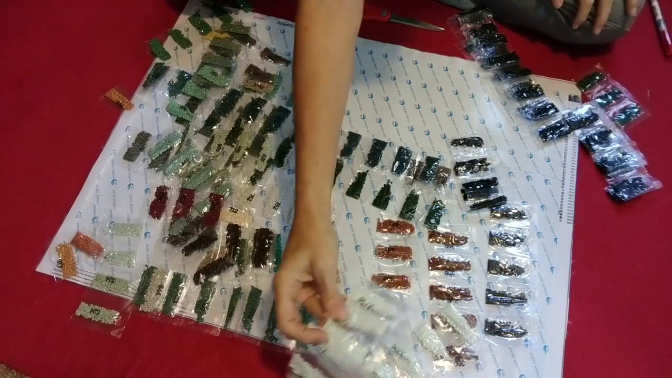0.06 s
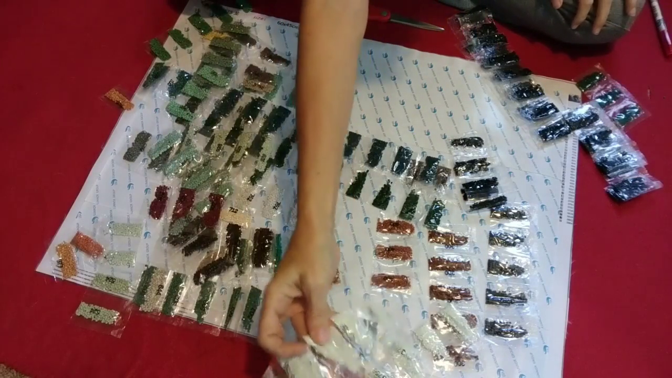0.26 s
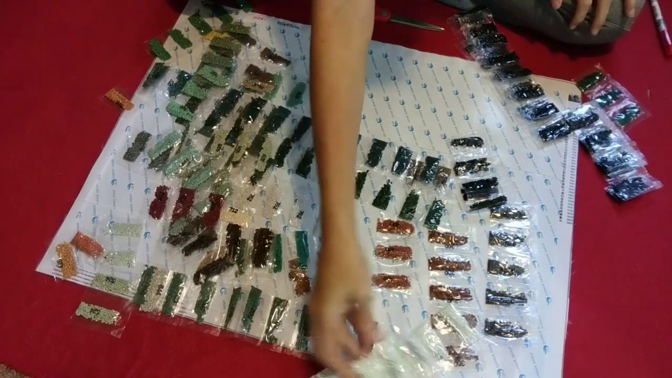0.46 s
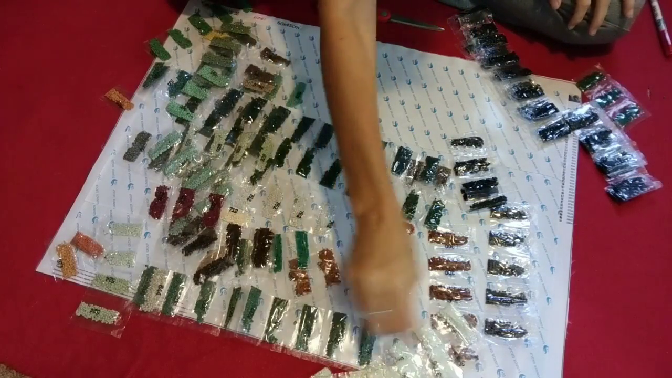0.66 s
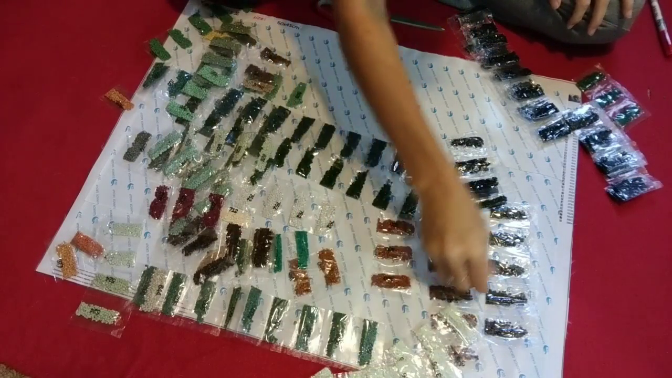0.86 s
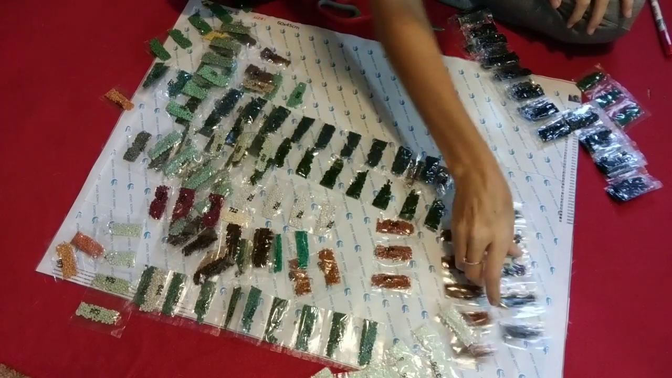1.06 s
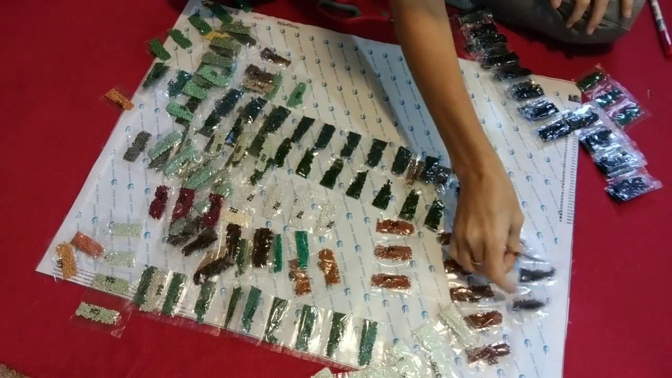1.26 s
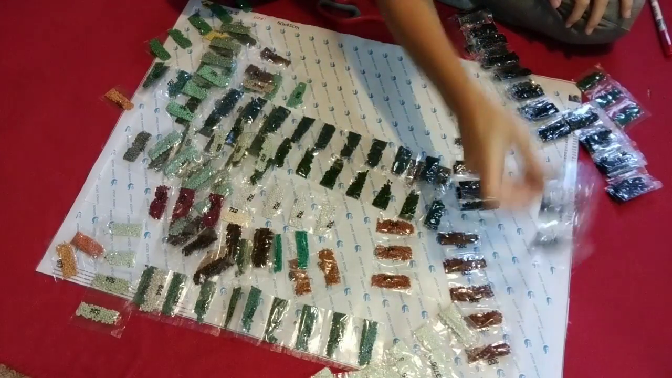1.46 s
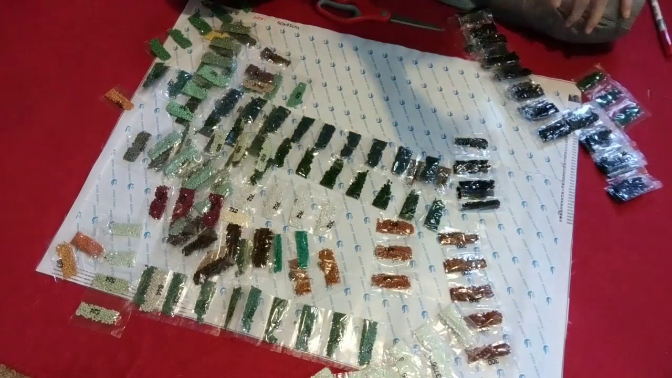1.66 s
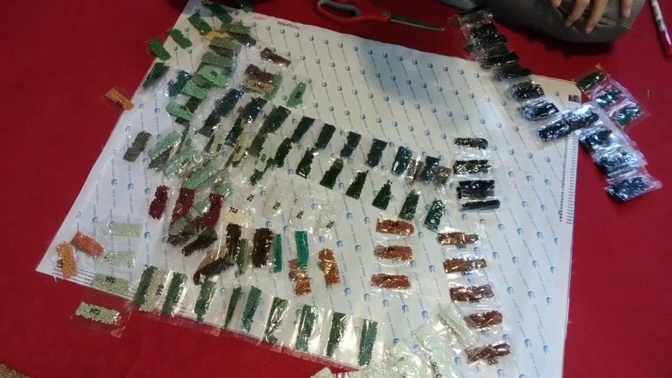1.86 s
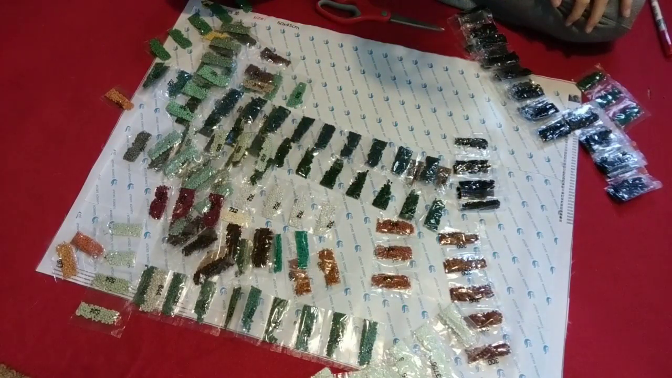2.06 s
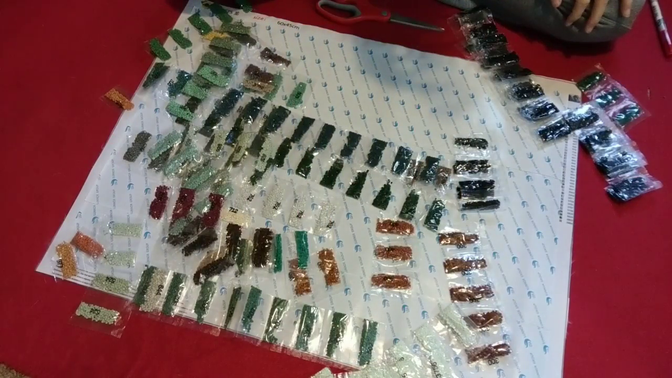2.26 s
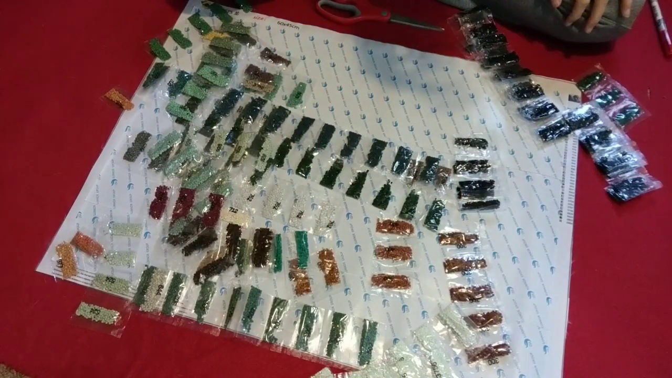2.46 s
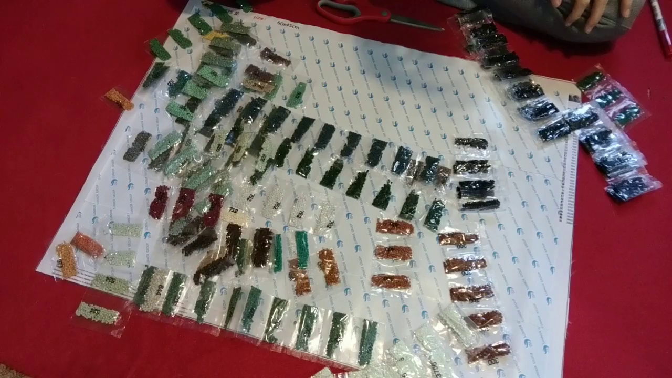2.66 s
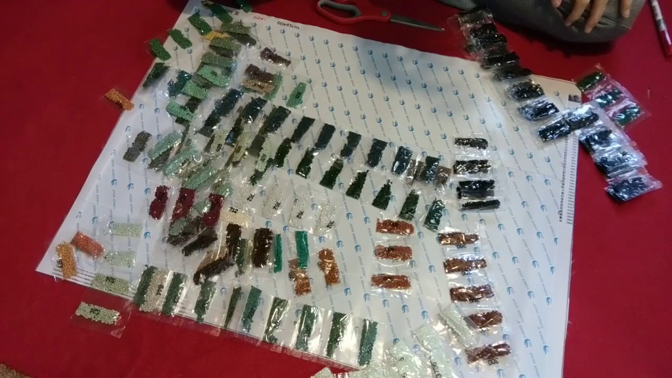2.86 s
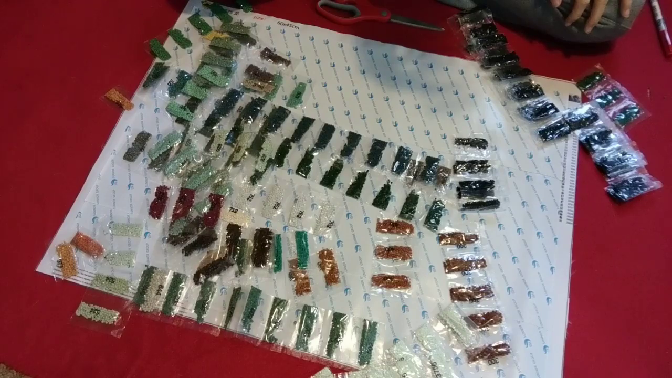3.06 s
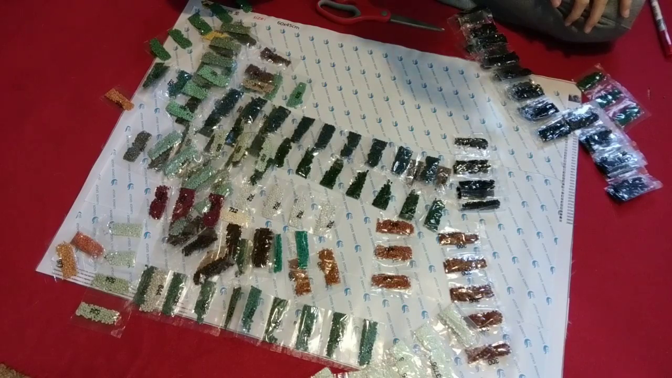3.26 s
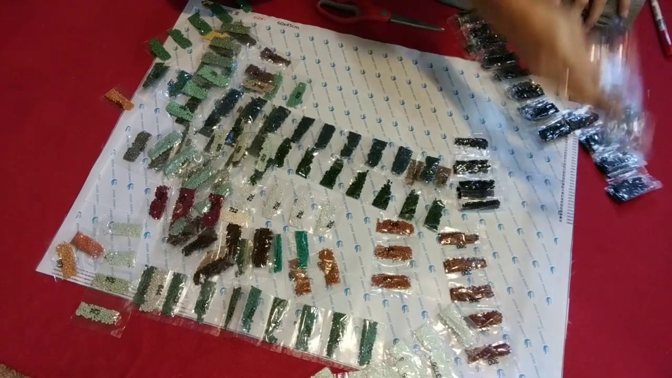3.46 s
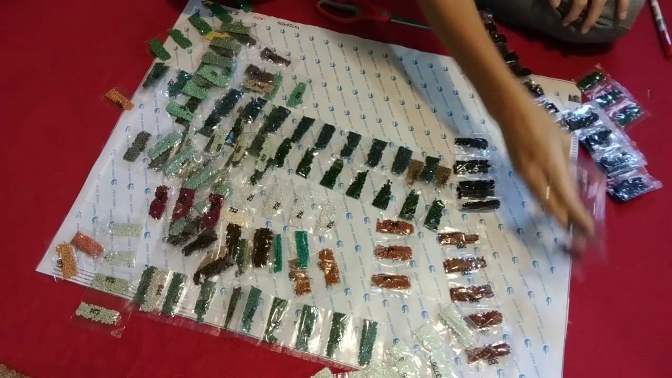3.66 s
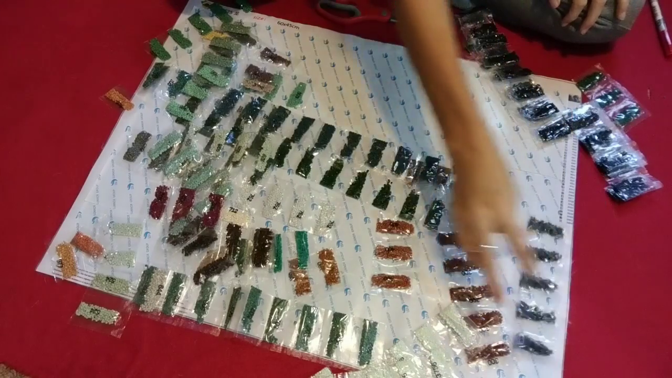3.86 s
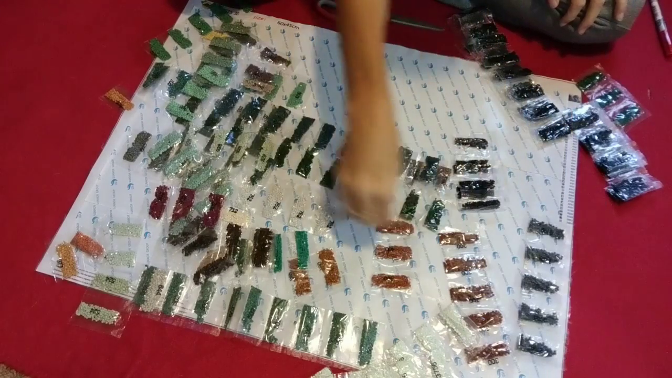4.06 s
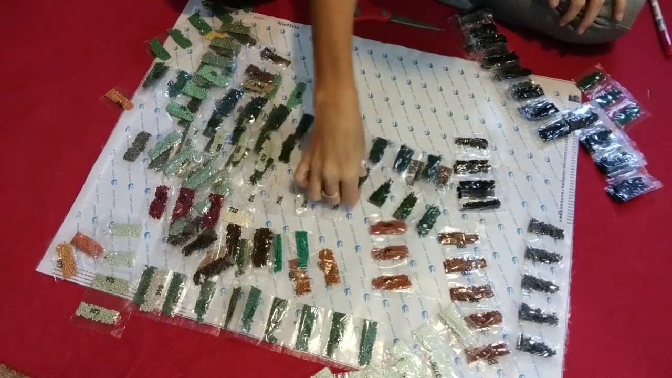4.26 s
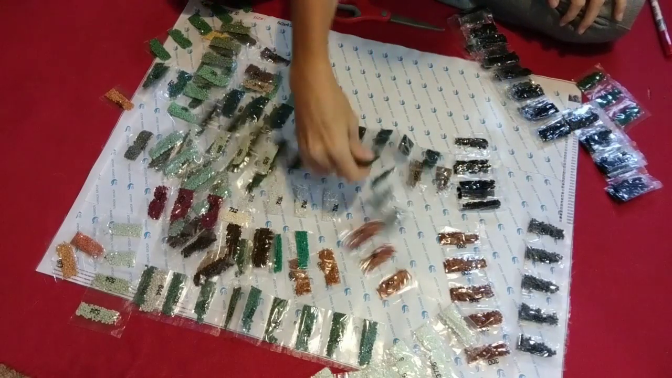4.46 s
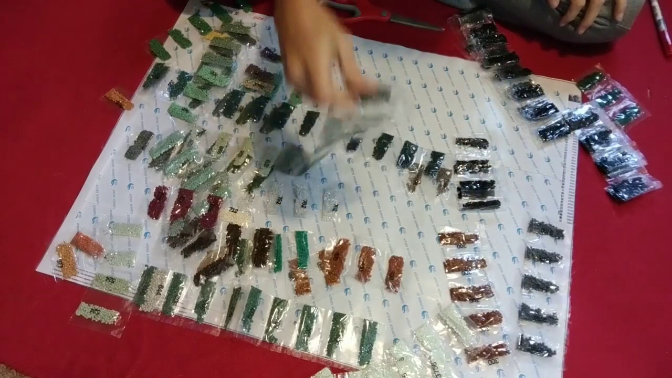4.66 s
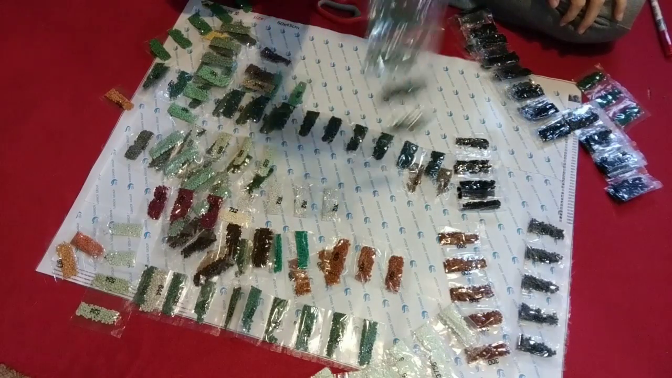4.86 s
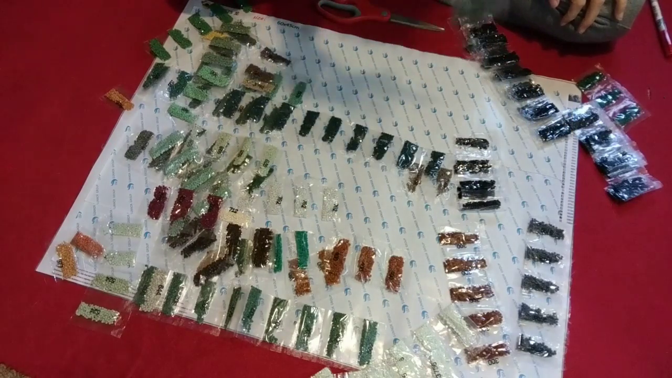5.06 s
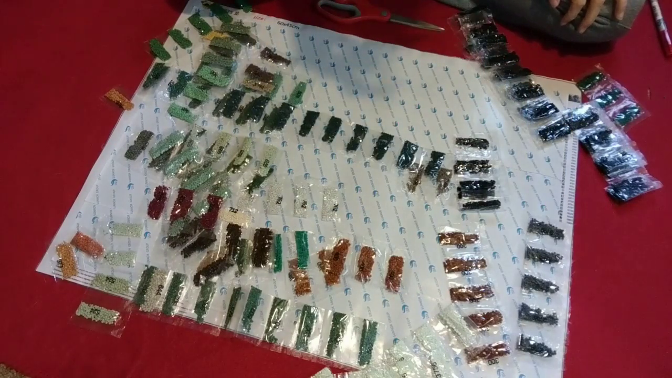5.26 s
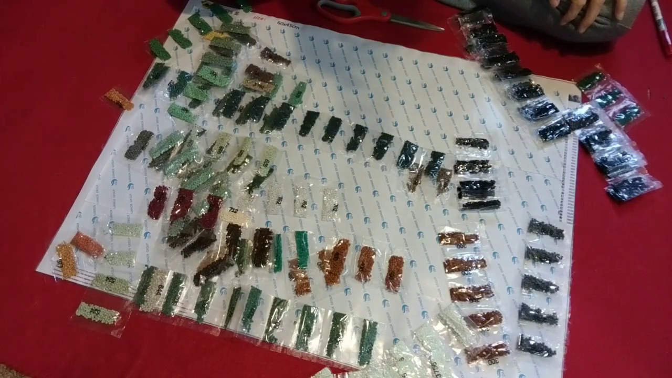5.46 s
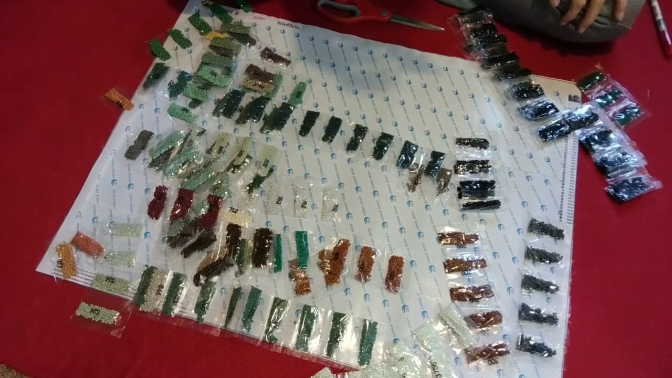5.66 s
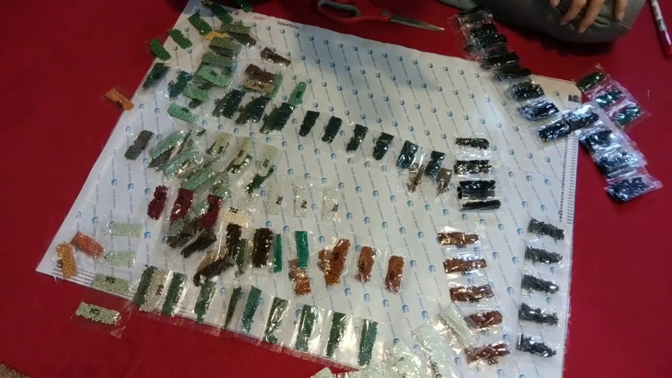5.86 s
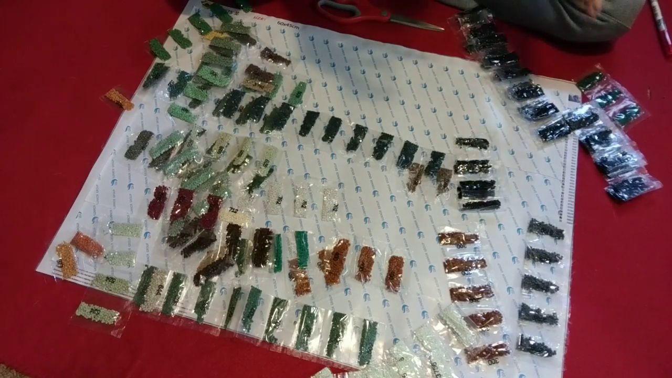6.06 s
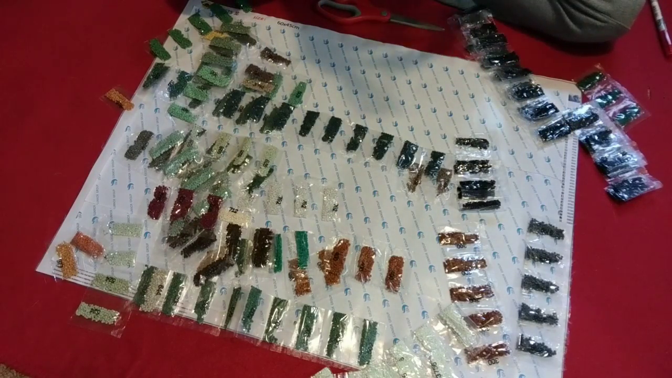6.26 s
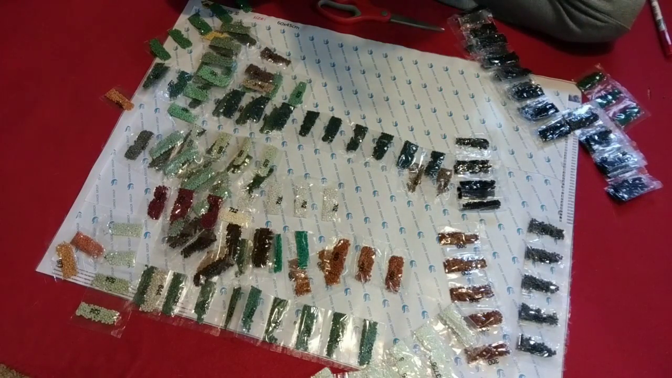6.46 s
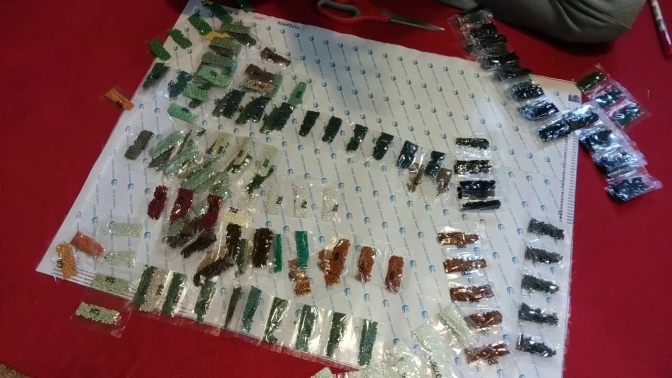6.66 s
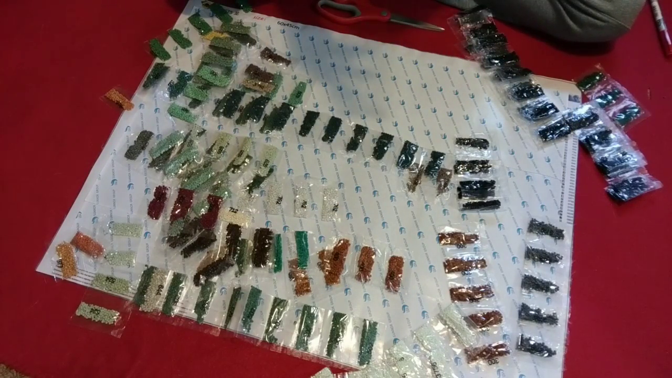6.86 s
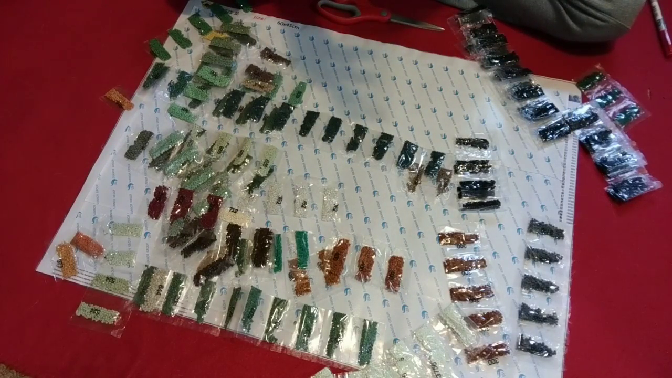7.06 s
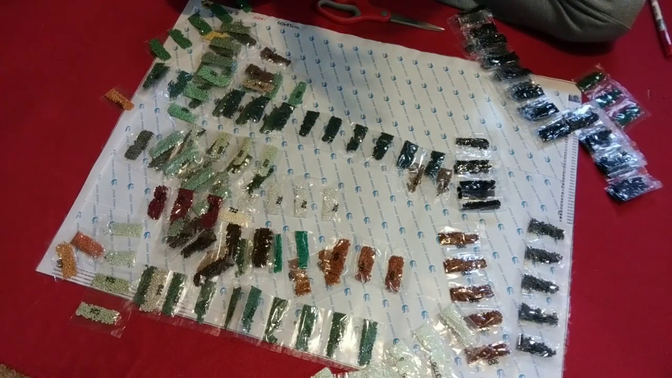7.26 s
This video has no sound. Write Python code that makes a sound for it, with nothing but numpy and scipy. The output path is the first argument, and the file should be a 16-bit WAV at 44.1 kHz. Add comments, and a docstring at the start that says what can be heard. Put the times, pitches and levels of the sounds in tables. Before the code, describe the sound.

Close, bright crinkling of small plastic bead bags being gathered by hand starts at once, pauses briefly, then flares and fades to sparse ticks. After a quiet gap a second busy flurry comes, with a crisp slap and sharp snaps. It thins out, then light rustling returns with one soft low thud near the end. Small quiet room, faint hiss and rumble.

```python
"""Small plastic bags of beads are gathered by hand from a sheet and laid down again, in a quiet room.
Film creases buckle singly (snaps: ringing facets) or in swarms (crinkle); sliding film hisses (shaped noise).
Slaps are short noise splashes; a brief squeak is narrow-band noise bending upward.
Soft bumps, the loudest near the end, are low noise pushes that set surface modes ringing.
Sparse random reflections make the room; faint hiss and a wavering rumble lie beneath."""
import sys
import numpy as np
from scipy import signal
from scipy.fft import rfft, irfft, next_fast_len
from scipy.io import wavfile
from scipy.ndimage import uniform_filter1d

SR = 44100
rng = np.random.default_rng(int(sys.argv[2]) if len(sys.argv) > 2 else 0)


def dump(signal):
    """Clip the signal to [-1, 1] and save it as 16-bit WAV at the path in sys.argv[1]."""
    limited = np.clip(np.atleast_2d(signal).T, -1, 1)
    pcm = np.round(limited * 32767).astype(np.int16)
    wavfile.write(sys.argv[1], SR, pcm)


N = 322371

# relative colour of the film: [f/Hz, density/dB per Hz]
FILM_COLOUR = [(60, -43.5), (250, -0.5), (600, -7.5), (2000, -4), (4000, 1), (10000, -1), (13000, -9),
               (16000, -10.5)]


def amp(db):
    """Decibels to gain."""
    return 10 ** (np.asarray(db) / 20)


def evened(x):
    """Scales to an rms of one."""
    return x / np.sqrt(np.mean(x ** 2) + 1e-20)


def unit(x):
    """Scales to an energy of one."""
    return x / np.linalg.norm(x)


def read(points, hz):
    """Interpolates (Hz, value) points on a log-frequency axis."""
    f, value = np.transpose(points)
    return np.interp(np.log(hz + 1), np.log(f + 1), value)


def coloured(x, points, size=4096):
    """Filters by a spectrum of (Hz, dB) points; minimum phase, so nothing sounds before its cause."""
    hz = abs(np.fft.fftfreq(size, 1 / SR))
    log_gain = np.log(amp(read(points, hz)))
    min_phase = np.exp(np.conj(signal.hilbert(log_gain)))
    taps = np.fft.ifft(min_phase).real[:size // 2]
    return signal.oaconvolve(x, taps)[:len(x)]


def add(mix, start_s, sound):
    """Mixes a sound in at its start time, cut at the end of the mix."""
    part = mix[max(round(start_s * SR), 0):][:len(sound)]
    part += sound[:len(part)]


def hush(level_db=-63.5, waver=0.31):
    """Faint steady hiss over a rumble that slowly wavers: noise plus its low end times a slow random drift."""
    # relative colour of the room noise: [f/Hz, density/dB per Hz]
    hush_colour = [(25, -10.5), (110, -4), (220, -8), (400, -11.5), (1200, -20.5), (2200, -22),
                   (6000, -24.5), (15500, -24.5)]
    noise = coloured(rng.standard_normal(N), hush_colour)
    rumble = signal.lfilter(*signal.butter(1, 500, fs=SR), noise)
    drift = uniform_filter1d(rng.standard_normal(N), SR // 8)
    drift = evened(uniform_filter1d(drift, SR // 20))
    return amp(level_db) * evened(noise + waver * drift * rumble)


def handling(rest_db=-76):
    """Each rustle rises, eases while held, then settles; returns effort, body lift and edge lift over time, dB."""
    # hand grips, drags or drops a bag:
    # [start/s, rise/s, hold/s, effort/dB, body near 1 kHz/dB, edge near 10 kHz/dB]
    rustles = [(0.0, 0.0018, 0.22, -41.5, 5.5, -4), (0.158, 0.036, 0.12, -41.5, 3, -0.5),
               (0.37, 0.069, 0.07, -50.5, 1, 3), (0.46, 0.024, 0.17, -45.5, 6, -1),
               (0.621, 0.018, .07, -34.5, 6.5, -4), (0.73, 0.0082, .02, -34, 1, -4.5),
               (0.933, 0.021, 0.018, -56, 7, -1), (1.125, 0.011, 0.0089, -41, 1.5, -0.5),
               (1.206, .015, 0.1, -39.5, 7.5, 2), (1.289, 0.047, 0.019, -32.5, -2, 0),
               (1.385, 0.017, 0.091, -37.5, 2.5, -1.5), (1.548, .015, 0.2, -43.5, 1, -6.5),
               (1.684, 0.021, 0.018, -34.5, 4.5, -3), (1.83, 0.023, 0.14, -59.5, 1.5, 1),
               (1.995, 0.022, 0.11, -53.5, 4.5, -0.5), (2.2, .03, 0.086, -64, 5, -4),
               (2.404, 0.0089, 0.06, -64, 2, 5), (3.318, 0.0045, 0.1, -59, 4, -5),
               (3.435, 0.063, 0.038, -41, 3, -4), (3.537, 0.034, 0.057, -35.5, 3, -2.5),
               (3.647, 0.0092, 0.016, -42, -11, 2), (3.7, .01, 0.052, -52.5, 3.5, 1.5),
               (3.814, 0.018, 0.13, -51, 10.5, 3.5), (3.94, 0.021, 0.038, -38.5, 5.5, -3),
               (4.04, 0.017, 0.02, -36.5, 9, 8), (4.365, .005, .03, -48, 5, 4.5),
               (4.384, 0.044, 0.067, -34, 3, 1.5), (4.529, 0.021, .04, -38.5, 4, 2),
               (4.618, 0.016, 0.11, -35.5, 9.5, -4), (4.722, 0.016, 0.043, -34, 0, -1),
               (4.821, 0.027, 0.063, -37, 5.5, 0.5), (4.95, .02, 0.027, -43, 4.5, -3),
               (5.038, .01, 0.2, -50, -3, -2.5), (5.176, 0.021, 0.14, -42.5, 4, -8),
               (5.306, 0.026, 0.046, -43.5, 4, -1), (5.407, 0.026, 0.15, -47, -4, -10),
               (5.96, 0.027, 0.044, -58, 6.5, -6), (6.118, 0.044, 0.032, -58.5, 5, -2),
               (6.304, 0.054, 0.13, -60.5, 2.5, -3), (6.485, 0.083, 0.059, -46, 6, -3.5),
               (6.699, 0.034, 0.051, -48, 7, -9), (6.843, 0.019, 0.066, -46, 6.5, -7.5),
               (6.931, .01, 0.04, -40.5, 10.5, -7), (7.031, 0.011, 0.057, -45, 9.5, -4.5),
               (7.154, 0.045, 0.058, -48.5, 7, -1.5)]
    ease_db_per_s, settle_db_per_s = 23.5, 262.5  # settling adds to easing
    firm_db, dulling = -42.5, 0.4  # lighter effort moves mainly broad folds: dB more body per dB less effort
    t = np.arange(SR) / SR
    power = np.full((3, N), amp(rest_db) ** 2)
    for start_s, rise_s, hold_s, db, body_db, edge_db in rustles:
        ease_db = ease_db_per_s * np.maximum(t - rise_s, 0)
        settle_db = settle_db_per_s * np.maximum(t - rise_s - hold_s, 0)
        grip = np.minimum(t / rise_s, 1) * amp(db - ease_db - settle_db)
        for band, lift_db in zip(power, [0, body_db, edge_db]):
            add(band, start_s, (grip * amp(lift_db)) ** 2)
    work_db, body_db, edge_db = 10 * np.log10(power)
    return work_db, body_db - work_db + dulling * (firm_db - work_db), edge_db - work_db


def facet(hz, crack_db, sharpness, flutter_db, flutter_s, flip_s=0.00013, crack_hz=10240):
    """A patch of film flips over and flutters briefly, ringing at its own pitch with a treble crack."""
    t = np.arange(600) / SR
    flip, flutter = rng.standard_normal((2, len(t)))
    flip = unit(flip * np.exp(-t / flip_s))
    flutter = unit(flutter * np.exp(-t / flutter_s))
    kick = flip + amp(flutter_db) * flutter
    kick = signal.lfilter(*signal.butter(1, hz / 2, "high", fs=SR), kick)  # a small patch radiates no bass
    ring = signal.lfilter(*signal.iirpeak(hz, max(sharpness, 1), fs=SR), kick)
    crack = signal.lfilter(*signal.iirpeak(crack_hz, 2, fs=SR), kick)
    return unit(unit(ring) + amp(crack_db) * unit(crack))


def swarm(work_db, per_s=2300, busy_db=-40, crowding=.55, spread_db=5, clump_db=2.5, clump_hz=60, count=96):
    """Tiny facet flips of many pitches and sizes, denser with effort; their sizes swell and dip in clumps."""
    sharpness, flutter_db, flutter_s = 1.8, -3, .0018
    rate_per_s = per_s * amp(crowding * (work_db - busy_db))  # per_s holds at busy_db
    flips = rng.random(N) < rate_per_s / SR
    sizes = amp(spread_db * np.minimum(rng.exponential(1, N), 3.2))
    sizes *= flips / np.sqrt(rate_per_s)  # density leaves the mean power alone
    clumps = evened(signal.lfilter(*signal.butter(2, clump_hz, fs=SR), rng.standard_normal(N)))
    sizes *= amp(clump_db * clumps)
    which, out = rng.integers(0, count, N), np.zeros(N)
    pitches_hz = np.linspace(np.sqrt(500), np.sqrt(15000), count) ** 2
    for k, (hz, width_hz) in enumerate(zip(pitches_hz, np.gradient(pitches_hz))):
        flip = facet(hz, -3.6, sharpness, flutter_db, flutter_s)
        out += np.sqrt(width_hz) * signal.oaconvolve(sizes * (which == k), flip)[:N]
    return evened(out)


def crinkle(level_db=-5.5, buckle_db=-60):
    """A light touch only slides the film with a hiss; a firmer one makes it buckle in swarms."""
    # centres of the body, middle and edge bands: [f/Hz]
    band_hz = [1100, 3800, 9500]
    work_db, body_db, edge_db = handling()
    buckling = 1 / (1 + amp(buckle_db - work_db) ** 2)  # share of power, half at buckle_db
    slide = rng.standard_normal(N)
    source = np.sqrt(buckling) * swarm(work_db) + np.sqrt(1 - buckling) * slide
    size = next_fast_len(N)
    hz = np.fft.rfftfreq(size, 1 / SR)
    spectrum = rfft(evened(coloured(source, FILM_COLOUR)), size)
    out = np.zeros(N)
    # broad folds give body, tight creases give edge
    for share, lift_db in zip(np.eye(3), [body_db, 0, edge_db]):
        weight = read(list(zip(band_hz, share)), hz)
        band = irfft(spectrum * weight, size)[:N]
        out += band * amp(work_db + lift_db + level_db)
    return out


def room(x, first_s=0.0022, reflections_per_s=5000):
    """Dense random reflections from the walls, each band dying at its own speed."""
    # decay of the room: [f/Hz, t60/s]
    room_decay = [(200, 0.39), (4000, 0.32), (9000, 0.25), (15000, 0.22)]
    size = SR // 2
    taps = rng.standard_normal(size) * (rng.random(size) < reflections_per_s / SR)
    hz, t, z = signal.stft(taps, SR, nperseg=256)
    decay_db = -60 * t / read(room_decay, hz)[:, None]
    tail = signal.istft(z * amp(decay_db), SR, nperseg=256)[1][:size]
    tail *= np.minimum(np.arange(size) / SR / first_s, 1) ** 2
    return signal.fftconvolve(x, unit(tail))[:N]


def snaps(wet_db=-7, scatter_db=-11):
    """Single creases buckle as facets; the walls also get what each sends elsewhere, in the film's colour."""
    # creases: [t/s, level over 2 ms before filtering/dB, facet pitch f/Hz, crack re ring/dB]
    creases = [(0.0807, -36.5, 2020, -12), (0.095, -34.5, 3420, -35), (0.2877, -38, 5820, -22),
               (0.401, -45, 3380, -6), (0.4745, -37, 2920, -12), (0.4856, -37.5, 720, -16),
               (0.5027, -37, 4330, -22), (0.5798, -35, 6760, -20), (0.9086, -41, 3300, 1),
               (0.9556, -44, 3770, -2), (1.3552, -27, 7390, -24), (1.3981, -29.5, 5500, -24),
               (1.4239, -31.5, 2620, 4), (1.5378, -38.5, 1900, -14), (1.748, -36, 1560, 1.5),
               (1.838, -41.5, 4420, 2), (1.8697, -41, 8050, 10), (1.955, -36.5, 2020, 3.5),
               (2.0312, -45.5, 1990, -9), (2.1043, -41.5, 5000, -18), (2.415, -39, 2600, -2.5),
               (2.4736, -39.5, 6760, -21), (2.5086, -38, 2910, 2.5), (2.8026, -41, 3160, 2.5),
               (2.9857, -49.5, 2380, -1.5), (3.333, -47, 1400, 12), (3.5571, -29, 7500, 0),
               (3.8367, -39.5, 3200, 5), (3.8702, -43.5, 4320, 0), (3.8954, -40.5, 4530, -7),
               (4.4828, -35, 6500, -3), (4.512, -31.5, 8000, 4), (4.5483, -29.5, 4020, -26),
               (4.5672, -30, 8000, -22), (4.6394, -35, 2200, -5), (4.6841, -33.5, 5820, 2),
               (4.7438, -25.5, 1070, 3), (4.8865, -26, 3400, -9), (4.9176, -33, 5350, 11),
               (4.9686, -36.5, 5300, 4), (5.0812, -38, 1140, -6), (5.1537, -39.5, 4730, -27),
               (5.3375, -31, 8000, -26), (5.3415, -40.5, 1490, -39), (5.348, -35.5, 6600, -24),
               (5.3698, -39, 3440, 1), (5.4738, -34, 1370, -38), (5.6038, -46.5, 786, -28),
               (5.7503, -44, 930, -14), (5.7996, -38, 1920, 12.5), (5.811, -41.5, 6500, -51),
               (5.992, -46.5, 2190, -2), (6.0458, -48.5, 9000, 2), (6.062, -45, 1940, 6),
               (6.332, -52.5, 3500, -2), (6.4792, -45, 2620, 2.5), (6.6295, -41.5, 4500, -24),
               (7.0563, -39, 1730, -24), (7.239, -43, 3470, -37)]
    out, scatter = np.zeros((2, N))
    span = np.sqrt(.002 * SR)  # unit energy to unit rms over 2 ms
    sharpness, flutter_db, flutter_s = 1.2, -2, .0024
    click = unit(coloured(signal.unit_impulse(256), FILM_COLOUR))
    for start_s, db, hz, crack_db in creases:
        size = span * amp(db)
        add(out, start_s, size * facet(hz, crack_db, sharpness, flutter_db, flutter_s))
        add(scatter, start_s, size * click)
    out = coloured(out, [(9000, 0.5), (15500, -5.5)])
    return out + room(amp(wet_db) * out + amp(scatter_db) * scatter)


def bumps(push_db=-1, ring_db=5, lag=1.3):
    """A soft contact swells and fades as low noise; as it fades, the surface modes are set ringing."""
    # contacts: [t/s, level before push_db and ring_db/dB, length/s, ring re level/dB, colour f factor]
    contacts = [(1.744, -56, 0.0252, -7, 1.34), (2.08, -63, 0.1, -8, 1.2), (3.363, -55, 0.03, -2.5, 1.5),
                (3.801, -60.5, .012, 8.5, 1.8), (3.853, -61.5, 0.071, 1.5, .7),
                (4.062, -58, 0.0095, -7.5, 1.8), (4.368, -51.5, 0.019, -23, 2.15),
                (6.934, -28.5, 0.024, 1.5, 0.9), (7.075, -48.5, 0.042, -2, 0.56),
                (7.236, -53.5, 0.019, 2, 1.7)]
    # push colour at factor 1: [f/Hz, density/dB per Hz]
    thud_colour = [(50, -24), (110, 1), (280, -3), (480, -7.5), (620, -20), (1200, -32), (4000, -39.5)]
    # surface modes: [f/Hz, relative level/dB, t60/s]
    surface_modes = [(98.2, -0.5, 0.26), (169, -10.5, 0.27), (226, -15, 0.2), (273, -13.5, 0.2),
                     (305, -21, 0.29)]
    out, t = np.zeros(N), np.arange(SR // 2) / SR
    ring = sum(amp(db - 60 * t / t60_s) * np.sin(2 * np.pi * hz * t) for hz, db, t60_s in surface_modes)
    ring *= 1 - np.exp(-t / 0.0052)
    for start_s, db, length_s, surface_db, hardness in contacts:
        force = np.sqrt(2 * t / length_s) * np.exp(.5 - t / length_s)
        colour = np.array(thud_colour) * [hardness, 1]
        push = coloured(rng.standard_normal(len(t)), colour) * force
        add(out, start_s, amp(db + push_db) * unit(push) * np.linalg.norm(force))
        add(out, start_s + lag * length_s, amp(db + surface_db + ring_db) * ring)
    return out


def squeak(width_hz=170):
    """Dragging film squeaks hollowly: rubbing noise in one narrow resonance that bends upward."""
    # squeak path: [t/s, level/dB, f/Hz]
    path = [(2.085, -67, 965), (2.096, -55, 976), (2.109, -58, 1268), (2.144, -67, 1286)]
    path_s, *columns = np.transpose(path)
    t = np.arange(path_s[0], path_s[-1], 1 / SR)
    db, hz = (np.interp(t, path_s, column) for column in columns)
    noise = [1, 1j] @ rng.standard_normal((2, SR))
    wander = signal.lfilter(*signal.butter(2, width_hz, fs=SR), noise)[-len(t):]
    carrier = np.exp(2j * np.pi * np.cumsum(hz) / SR)
    out = np.zeros(N)
    add(out, path_s[0], amp(db) * evened((wander * carrier).real))
    return out


def slaps(rise_s=0.00031):
    """A bag slaps down; bead and fold strikes merge into one short splash of decaying noise."""
    # splashes: [t/s, level before envelope/dB, decay/s, treble gain from 9 kHz/dB]
    splashes = [(4.0435, -31, .004, -7), (4.055, -36, 0.0036, -3), (4.065, -23, 0.004, 8),
                (4.0739, -24.5, 0.0028, 1.5), (4.0842, -24.5, 0.0047, 7), (5.19, -29.5, 0.0042, 0),
                (5.5202, -39.5, 0.0077, 19)]
    out, t = np.zeros(N), np.arange(2400) / SR
    for start_s, db, decay_s, treble_db in splashes:
        chatter = coloured(rng.standard_normal(len(t)), FILM_COLOUR)
        chatter = coloured(chatter, [(300, 4), (900, 6), (2200, -1), (9000, treble_db)])
        envelope = (1 - np.exp(-t / rise_s)) * np.exp(-t / decay_s)
        add(out, start_s, amp(db) * evened(chatter) * envelope)
    return out


def scene(bags_wet_db=-6, bumps_wet_db=-17):
    """Bags, bumps and steady noise in the room."""
    bags = crinkle() + slaps() + squeak()
    thuds = bumps()
    echo = room(amp(bags_wet_db) * bags + amp(bumps_wet_db) * thuds)
    return (snaps() + bags + thuds + echo + hush())[None]


def record(dry, edge_hz=15650):
    """The microphone's port resonance lifts the treble near 9 kHz; a low-pass limits the band."""
    # port resonance: [f/Hz, gain/dB]
    port_gain = [(7000, 2.5), (8200, -1.5), (8600, 2), (9100, 7), (9800, 3), (11000, 1.5)]
    heard = coloured(dry[0], port_gain)
    low_pass = signal.firwin(511, edge_hz, window=("kaiser", 8), fs=SR)
    return signal.oaconvolve(heard, low_pass, "same")[None]


dry = scene()
out = record(dry)
dump(out)
```